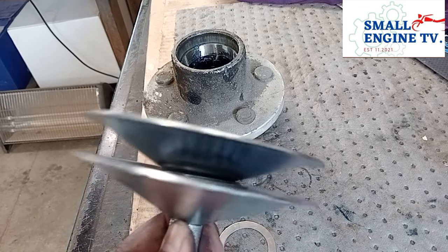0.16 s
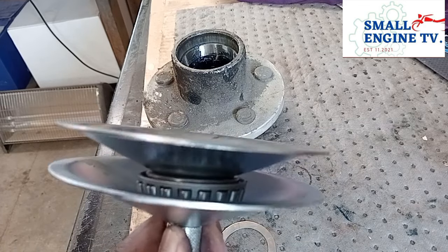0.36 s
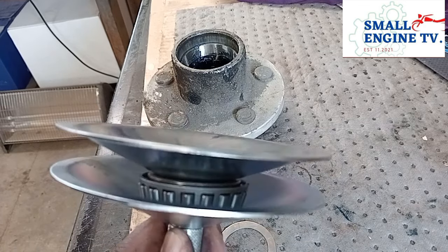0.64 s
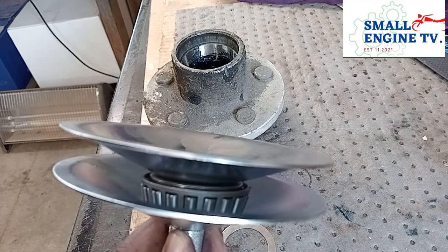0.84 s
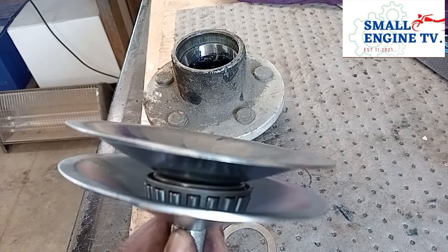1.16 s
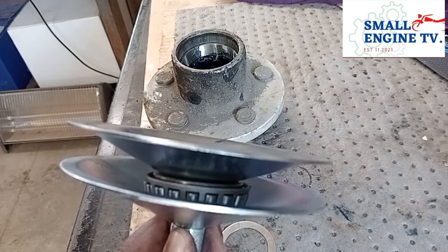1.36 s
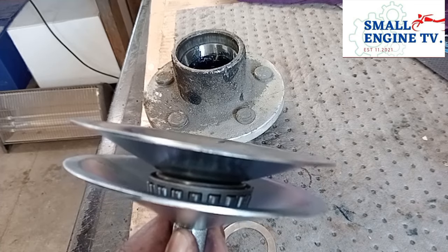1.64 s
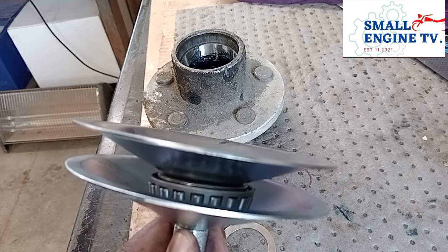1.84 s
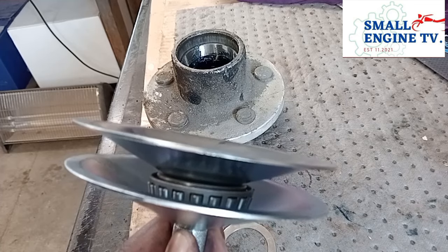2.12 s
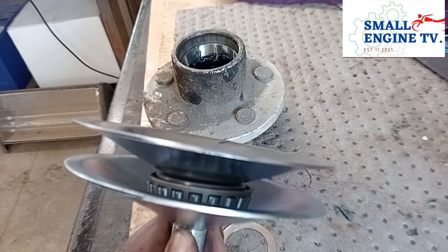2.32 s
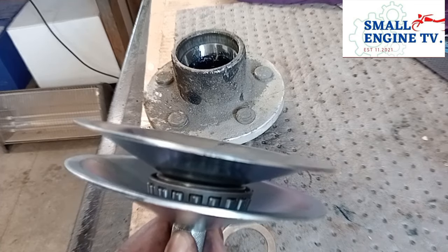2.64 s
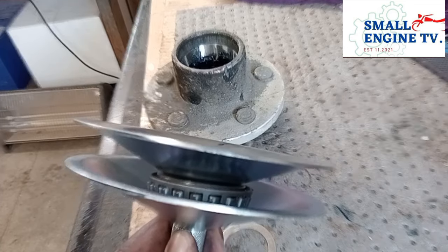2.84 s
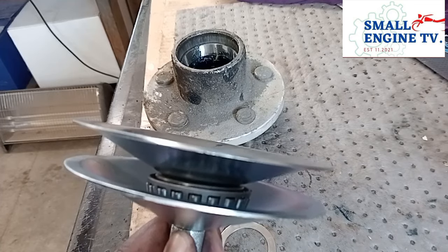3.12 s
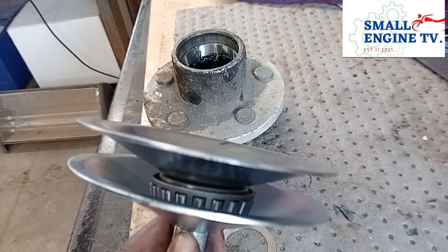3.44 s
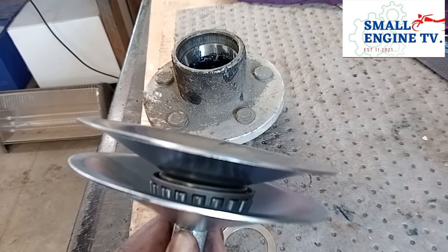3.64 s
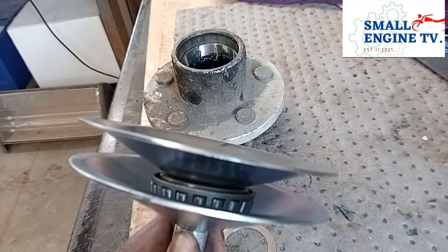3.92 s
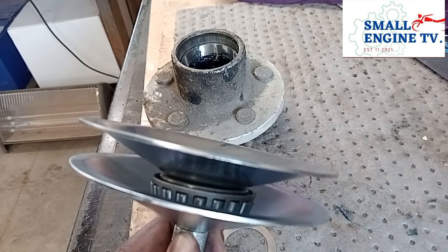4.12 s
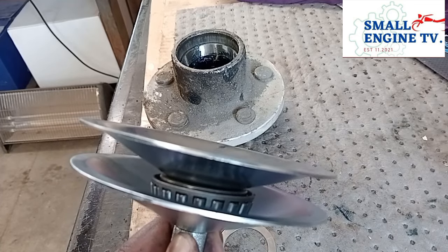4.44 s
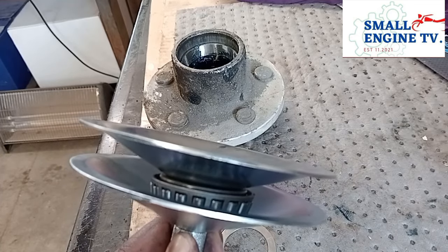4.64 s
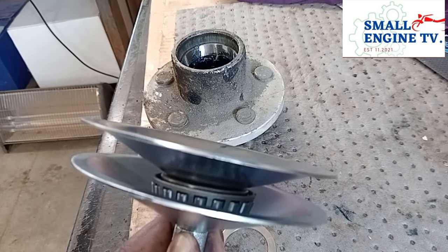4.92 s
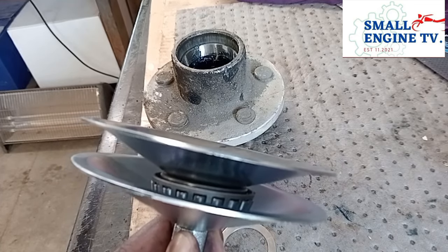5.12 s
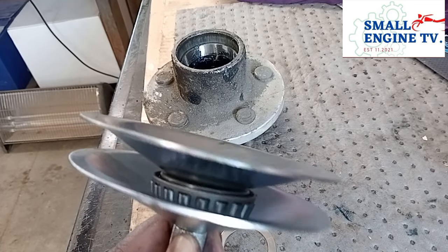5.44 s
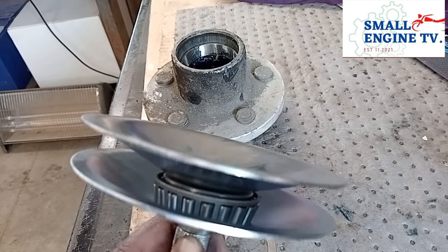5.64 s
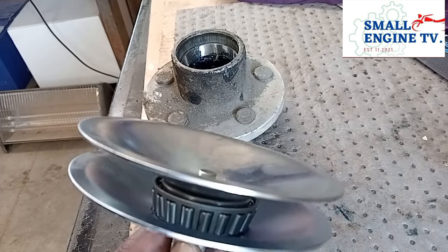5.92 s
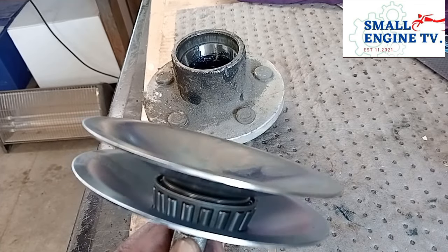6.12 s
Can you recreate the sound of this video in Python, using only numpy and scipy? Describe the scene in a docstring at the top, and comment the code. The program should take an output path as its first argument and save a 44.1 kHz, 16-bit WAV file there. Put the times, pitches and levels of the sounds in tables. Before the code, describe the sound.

A close, dry-edged sound in a small workshop with a short bright ring. Until 1.1 s there is only thin steady leak hiss, low rumble and wavering hum. At 1.1 s the air gun spits, its whistle sliding down from very high, with heavy crackling gusts on the microphone; three light knocks follow before it shuts near 1.7 s. A small hollow chuff comes at 1.8. The second pull, 2.1 to 2.9 s, starts with a strong wind pop, then hiss and steady knocks, ending in a burst of bleeding air. The third, 3.2 to 4.15 s, begins softly, then from 3.6 slams out five loud metallic cracks, most with deep booms. The fourth, 4.6 to 5.3 s, spits briefly, buffets and gives four moderate knocks. A last air bleed fades by 5.5 s, leaving faint hiss, rumble and hum to 6.3 s.

```python
"""An air-powered grease gun fills a bearing in a cone packer, close to the microphone, in a small workshop.
Four trigger pulls: each spits and whistles, then filtered noise hisses as air through the motor.
Meanwhile the piston knocks about 7.5 times a second: noise bursts ring the body, a low sine booms.
As the valve opens and shuts, exhaust blows across the microphone as random kicks through a filter.
A steady thin hiss, a low rumble and a wavering hum lie behind."""
import sys
import numpy as np
from scipy import signal
from scipy.fft import rfft, irfft
from scipy.io import wavfile
from scipy.ndimage import uniform_filter1d

SR = 44100
rng = np.random.default_rng(int(sys.argv[2]) if len(sys.argv) > 2 else 0)


def bounce(signal):
    """Save signal as a 16-bit WAV file at the path given by the first command-line argument."""
    frames = np.transpose(np.atleast_2d(signal))
    limited = np.clip(frames, -1, 1)
    pcm = np.round(limited * 32767).astype(np.int16)
    wavfile.write(sys.argv[1], SR, pcm)


N = 276948
TIME = np.arange(N) / SR

# trigger pulls: (valve opens [s], held for [s], relative spit level [dB], spit length [s])
TRIGGER_PULLS = [(1.069, 0.65, -17.5, 0.1), (2.07, 0.83, -18.5, 0.04), (3.164, 0.99, -17.5, 0.044),
                 (4.623, .672, -16.5, 0.021)]
# piston strokes: (time [s], relative knock level [dB], relative boom level [dB])
PISTON_STROKES = [(1.399, -32, -28), (1.535, -26, -30), (1.666, -24.5, -30), (2.213, -27.5, -26),
                  (2.346, -23.5, -27.5), (2.481, -23, -28), (2.615, -25, -27.5), (2.754, -23, -27),
                  (2.935, -21.5, -28.5), (2.963, -30.5, -32), (3.311, -24, -28), (3.438, -25, -24),
                  (3.57, -14, -17), (3.701, -12, -16), (3.831, -13.5, -15.5), (3.961, -13.5, -15.5),
                  (4.092, -12.5, -30), (4.768, -24.5, -30.5), (4.895, -25.5, -30), (5.025, -22.5, -26.5),
                  (5.158, -24, -27.5)]


def undb(db):
    """Decibels to gain."""
    return 10 ** (np.asarray(db) / 20)


def unit(x):
    """Scale to rms 1."""
    return x / np.sqrt(np.mean(x ** 2))


def add(out, start_s, x):
    """Mix x into out at start_s."""
    i = max(int(start_s * SR), 0)
    out[i:i + len(x)] += x[:N - i]


def walk(rate_hz):
    """Random levels held 1 / rate_hz and slewed twice; rms 1."""
    hold = int(SR / rate_hz)
    steps = rng.standard_normal(N)[np.arange(N) // hold]
    slewed = uniform_filter1d(steps, hold)
    return unit(uniform_filter1d(slewed, hold))


def colour(x, points, size=4096):
    """Minimum-phase filter of unit energy through points (frequency [Hz], relative level [dB])."""
    hz, db = np.transpose(points)
    bins_hz = np.maximum(np.arange(size // 2 + 1) * SR / size, 1)
    gain = undb(np.interp(np.log(bins_hz), np.log(hz), db))
    # fold the cepstrum to make the response causal
    cepstrum = irfft(np.log(gain))
    cepstrum[1:size // 2] *= 2
    cepstrum[size // 2 + 1:] = 0
    response = irfft(np.exp(rfft(cepstrum)))
    return signal.fftconvolve(x, response / np.linalg.norm(response))[:len(x)]


def noise(points):
    """Turbulent air with the given spectrum, rms near 1."""
    return colour(rng.standard_normal(N), points)


def ring(x, modes):
    """Parallel resonances (frequency [Hz], width [Hz], gain [dB])."""
    return sum(undb(db) * signal.lfilter(*signal.iirpeak(hz, hz / width_hz, SR), x)
               for hz, width_hz, db in modes)


def swell(start_s, length_s, attack_s, release_s):
    """Gain that rises in a straight line, holds until the length is over, then decays exponentially."""
    t = TIME - start_s
    rise = np.clip(t / attack_s, 0, 1)
    return rise * np.exp(-np.clip((t - length_s) / release_s, 0, 20))


def workshop(x, near_db=-5, near_s=0.004, tail_db=-12, t60_s=0.74):
    """Quick reflections off the bench and the steel cones, then the short ring of the room."""
    t = TIME[:SR]
    near, tail = rng.standard_normal((2, SR))
    near = near * np.exp(-t / near_s) * (t > 0.001)
    tail = colour(tail, [(100, -5), (400, -22.5), (1500, -3), (2800, -0.5), (3700, 5), (4800, 6),
                         (6000, 6.5), (8500, 1), (11000, 2.5), (14000, -42)])
    tail = tail * np.exp(-np.log(1000) * t / t60_s) * (t > 0.008)
    response = undb(near_db) * near / np.linalg.norm(near)
    response += undb(tail_db) * tail / np.linalg.norm(tail)
    response[0] += 1  # direct sound
    return signal.fftconvolve(x, response / np.linalg.norm(response))[:N]


def background(rumble_drift_db=1.5, leak_ring_db=-7):
    """A low rumble with a wavering hum, and a thin steady hiss as of a small leak in the air line."""
    # (time [s], rumble level [dB], hum level [dB], hiss level [dB])
    background_levels = [(0, -51, -46, -45), (1, -47, -47, -44), (4.5, -47.5, -65, -45.5),
                         (6.28, -50.5, -47.5, -47)]
    # (frequency [Hz], relative level [dB])
    rumble_spectrum = [(20, -22), (35, -30), (50, -34), (68, -28), (100, -4), (145, -4.5), (220, -9.5),
                       (350, -21.5), (600, -21), (1000, -27), (2000, -31), (3000, -55)]
    # (frequency [Hz], relative level [dB])
    leak_spectrum = [(1200, -20.5), (2000, -18), (2400, -8.5), (2700, -6.5), (3300, 0), (3900, -6.5),
                     (5500, -11.5), (6700, -5), (7500, -10.5), (8650, 1), (10800, -15.5), (13200, -7),
                     (15500, -11)]
    time_s, *levels = np.transpose(background_levels)
    rumble_db, hum_db, hiss_db = (np.interp(TIME, time_s, level) for level in levels)
    # two narrow resonances in series
    hum = ring(rng.standard_normal(N), [(72.2, 7, -2)])
    hum = unit(ring(hum, [(68, 10, 0)]))
    leak = noise(leak_spectrum)
    leak_modes = [(3070, 70, -10), (3960, 330, 6), (6420, 200, -15), (8460, 130, 14.5)]
    leak += undb(leak_ring_db) * unit(ring(rng.standard_normal(N), leak_modes))
    rumble = noise(rumble_spectrum) * undb(rumble_db + rumble_drift_db * walk(rate_hz=7))
    return rumble + hum * undb(hum_db) + workshop(leak) * undb(hiss_db)


def stall(dip_db=-3, lead_s=0.019, width_s=0.013):
    """The air flow sags as the piston slows just before each stroke."""
    dips = sum(np.exp(-((TIME - s + lead_s) / width_s) ** 2) for s, _, _ in PISTON_STROKES)
    return undb(dip_db * dips)


def air(hiss_db=6.5, port_db=-7, bleed_db=1, flutter_db=-1.56):
    """Air rushes through the motor and rings its passages; the rest bleeds off as the trigger is eased."""
    # the gun's body and air passages: (frequency [Hz], width [Hz], gain [dB])
    port_modes = [(2330, 81, -20), (2750, 180, 7), (3350, 24, -9), (3730, 130, -14), (4300, 120, -2),
                  (5220, 38, 0), (6170, 120, -3.5), (6940, 36, -12), (7160, 210, 0), (7860, 120, -6.5),
                  (8850, 280, 0), (8930, 180, 3), (10540, 190, -25), (10700, 73, -9.5)]
    # (frequency [Hz], relative level [dB])
    hiss_spectrum = [(150, -10), (300, -8.5), (700, -8.5), (1100, -5.5), (1800, -7), (2700, -6), (3800, -1),
                     (4700, -3.5), (5700, -9), (6700, -9), (8700, 1.5), (10300, -9.5), (13000, -9.5),
                     (15500, -11)]
    # (frequency [Hz], relative level [dB])
    bleed_spectrum = [(290, -49), (500, -20), (648, -23), (1130, -13), (1410, -18), (1560, -12),
                      (3150, -3.5), (5200, -3), (5590, -10.5), (8600, -4.5), (9930, -16), (15500, -14.5)]
    # flow through the motor while the trigger is held: (time [s], relative level [dB])
    flow_levels = [(1.1, -36), (1.7, -32.5), (2.12, -29.5), (2.4, -36), (2.83, -35), (2.88, -30.5),
                   (3.31, -34), (3.45, -43), (3.57, -33), (3.9, -30.5), (4.14, -26), (4.75, -33.5),
                   (4.86, -39.5), (5.02, -38), (5.28, -31.5)]
    # air bleeding off: (start [s], length [s], relative level [dB])
    bleed_events = [(1.465, 0.33, -35), (2.845, 0.035, -22.5), (5.299, .2, -31)]
    ports = unit(ring(rng.standard_normal(N), port_modes))
    valve = sum(swell(s, held_s, attack_s=0.0051, release_s=0.0081) for s, held_s, _, _ in TRIGGER_PULLS)
    flow = valve * stall() * undb(np.interp(TIME, *np.transpose(flow_levels)))
    hiss = (noise(hiss_spectrum) + undb(port_db) * ports) * flow * undb(hiss_db)
    escape = sum(undb(db) * swell(s, length_s, attack_s=0.024, release_s=0.017)
                 for s, length_s, db in bleed_events)
    bleed = noise(bleed_spectrum) * escape * undb(bleed_db)
    return (hiss + bleed) * undb(flutter_db * walk(rate_hz=34))


def spit(start_hz=4700, end_hz=8600, rise_s=0.025, jet_db=-3):
    """The opening valve spits at once; its jet, noise on a sine, rises in pitch as it gathers speed."""
    # (frequency [Hz], relative level [dB])
    spit_spectrum = [(100, -1), (250, -9), (700, -1.5), (1700, -12), (3000, -2.5), (4800, -0.5),
                     (6500, -3.5), (8600, 4.5), (10500, -25), (15500, -12.5)]
    t = TIME[:SR // 4]
    pitch_hz = end_hz + (start_hz - end_hz) * np.exp(-(t / rise_s) ** 2)
    carrier = np.sin(2 * np.pi * np.cumsum(pitch_hz) / SR)
    gain, jet = np.zeros(N), np.zeros(N)
    for s, _, db, length_s in TRIGGER_PULLS:
        opening = undb(db) * np.minimum(t / 0.0027, 1) * np.exp(-(t / length_s) ** 3)
        add(gain, s, opening)
        add(jet, s, opening * carrier)
    jet *= np.sqrt(2) * noise([(400, 3), (900, 4), (2500, -13.5)])
    return gain * noise(spit_spectrum) + undb(jet_db) * jet


def gusts(wake_db=-32, opening_db=-27, opening_s=0.012, core_share=0.81):
    """Wind strength and its crackling core: a small puff as the valve opens, then gusts with weak wakes."""
    # (start [s], length [s], relative buffeting [dB], relative crackle [dB], wake length [s])
    gust_events = [(1.123, 0.021, -18.5, -23.5, .02), (1.165, .012, -19, -13.5, .015),
                   (1.189, 0.049, -22, -17, 0), (1.242, 0.04, -22, -17, 0),
                   (1.286, 0.067, -19.5, -16.5, .15), (1.674, 0.035, -19, -36, .005),
                   (2.103, .025, -13.5, -11, .055), (2.865, 0.0103, -15.5, -27, 0),
                   (3.197, 0.031, -18, -17, 0.083), (4.122, 0.0096, -21.5, -25, .005),
                   (4.646, 0.05, -19.5, -14.5, .06), (5.254, 0.013, -22.5, -20.5, .015)]
    wind = undb(opening_db) * sum(swell(s, opening_s, attack_s=0.002, release_s=0.015)
                                  for s, _, _, _ in TRIGGER_PULLS)
    core = np.zeros(N)
    for s, length_s, wind_db, crackle_db, wake_s in gust_events:
        wind += undb(wind_db) * swell(s, length_s, attack_s=0.0033, release_s=0.0071)
        wind += undb(wake_db) * swell(s + length_s, wake_s, attack_s=0.004, release_s=0.007)
        core += undb(crackle_db) * swell(s, core_share * length_s, attack_s=0.0032, release_s=0.012)
    return wind, core


def eddies(rate_hz, scatter_db):
    """Kicks at random moments, of either sign and uneven size; rms near 1."""
    chance = np.maximum(rate_hz, 1) / SR
    signs = rng.choice([-1, 1], N)
    sizes = signs * undb(scatter_db * np.clip(rng.standard_normal(N), -2, 1.5))
    return (rng.random(N) < chance) * sizes / np.sqrt(chance)


def buffeting(eddy_rate_hz=330, crackle_rate_hz=1500, gust_db=5, surge_db=-1, uneven_db=3, tear_db=-14):
    """Eddies strike the microphone as random pressure kicks; a stronger wind sheds them faster."""
    # single strong eddies that pop on the microphone: (time [s], peak [dB])
    thump_events = [(1.174, -1), (1.231, 0), (1.364, -3), (1.378, -5.5), (1.425, -8.5), (1.471, -6),
                    (1.505, -12), (1.704, -4.5), (2.151, 2.5), (2.166, -6), (2.186, -7), (2.87, -7.5),
                    (3.23, -7), (3.255, -12), (4.129, -4.5), (4.731, -11.5), (5.256, -5.5), (5.267, -6)]
    # (frequency [Hz], relative level [dB])
    eddy_spectrum = [(25, -46), (60, -4.5), (110, 4), (250, -0.5), (600, -7), (1200, -15.5), (2500, -19.5),
                     (4000, -31.5), (6000, -28), (12000, -76)]
    # (frequency [Hz], relative level [dB])
    crackle_spectrum = [(60, -5), (200, 1), (750, 2.5), (1500, -4.5), (2800, -3), (4200, -5), (6000, -30),
                        (13000, -43)]
    strength, core = gusts()
    # eddy_rate_hz holds at a strength of -20 dB
    kicks = eddies(eddy_rate_hz * strength / undb(-20), scatter_db=-1) * strength
    pressure = colour(kicks, eddy_spectrum) * undb(gust_db)
    thump = colour(signal.unit_impulse(SR // 20), eddy_spectrum)
    for s, db in thump_events:
        add(pressure, s, -undb(db) * thump / thump.max())
    surge = core * undb(surge_db + uneven_db * walk(rate_hz=90))
    pressure += colour(surge * eddies(crackle_rate_hz, scatter_db=2.5), crackle_spectrum)
    # fine turbulence tears at the microphone while an eddy presses on it
    tearing = np.abs(pressure) * noise([(300, -8.5), (1000, 14), (3500, -10), (5500, -4), (14000, -35)])
    return pressure + undb(tear_db) * tearing


def whistle(waver=0.0232, flicker_db=2.5, level_db=-4, bend=1.5, peak_s=0.02, peak_width_s=0.015, hold_db=-9):
    """Unsteady edge tone at the half-open valve: flares, then holds softly; its pitch slides ever faster."""
    # (start [s], length [s], first pitch [Hz], last pitch [Hz], relative level [dB])
    seat_whistles = [(1.103, 0.21, 8000, 6950, -11), (1.68, 0.033, 5160, 5920, -23),
                     (2.082, 0.056, 8030, 5250, -14), (3.186, 0.041, 7780, 5770, -16),
                     (4.629, 0.033, 8700, 7500, -11.5)]
    unsteady = 1 + waver * walk(rate_hz=1000)
    flicker = unit(undb(flicker_db * walk(rate_hz=200)))
    out = np.zeros(N)
    for s, length_s, first_hz, last_hz, db in seat_whistles:
        slide = np.clip((TIME - s) / length_s, 0, 1) ** bend
        pitch_hz = first_hz + (last_hz - first_hz) * slide
        flare = np.exp(-((TIME - s - peak_s) / peak_width_s) ** 2)
        gain = (flare + undb(hold_db)) * swell(s, length_s, attack_s=0.006, release_s=0.003)
        out += undb(db) * gain * np.sin(2 * np.pi * np.cumsum(pitch_hz * unsteady) / SR)
    return out * flicker * undb(level_db)


def knocks(contact_s=0.0087, rattle_s=0.024, rattle_db=-16, body_db=6, crack_db=-3.5):
    """At each stroke the piston slams its stop with a broad crack and chatters in the metal body."""
    # (frequency [Hz], width [Hz], gain [dB])
    body_modes = [(1137, 37, -12.5), (1350, 250, -6), (1810, 1600, -16), (2650, 190, 4.5), (3240, 52, -3),
                  (3574, 59, 3), (4050, 260, -8.5), (4580, 130, -12), (8830, 930, -9.5),
                  (10200, 610, -26.5)]
    t = TIME[:SR // 6]
    hit = np.exp(-(t / contact_s) ** 2) + undb(rattle_db) * np.exp(-t / rattle_s)
    force = np.zeros(N)
    for s, db, _ in PISTON_STROKES:
        add(force, s, undb(db) * hit)
    force = force * rng.standard_normal(N)
    crack = colour(force, [(100, -4.5), (260, 10.5), (450, -14), (900, -9), (1400, -8), (2000, -11),
                           (4500, -7), (6000, -22.5), (10500, -9), (14000, -21.5)])
    body = colour(ring(force, body_modes), [(1000, 2.5), (4500, -3), (5800, -16.5), (8500, -1),
                                            (11000, 3.5), (14000, -23)])
    return undb(body_db) * body + undb(crack_db) * crack


def boom(boom_hz=152.5, push_s=0.013, return_s=0.032, swell_s=0.026, push_db=0.5, return_db=2):
    """The stroke and the piston's return each swell a low tone, in opposite directions."""
    t = TIME[:SR // 3]
    late = np.maximum(t - return_s, 0) / swell_s
    push = undb(push_db) * t / push_s * np.exp(1 - t / push_s)
    back = undb(return_db) * late ** 2 * np.exp(2 - 2 * late)
    tone = (push - back) * np.sin(2 * np.pi * boom_hz * t)
    out = np.zeros(N)
    for s, _, db in PISTON_STROKES:
        add(out, s, undb(db) * tone)
    return out


def exhaust(delay_s=0.035, spread_s=0.035, level_db=-8):
    """The returning piston pushes a puff of spent air out of the motor's port."""
    gain = sum(undb(db) * np.exp(-((TIME - s - delay_s) / spread_s) ** 2) for s, _, db in PISTON_STROKES)
    puff = noise([(500, -9.5), (1500, -11.5), (2700, -8), (3700, -2.5), (4400, -8), (5600, -28),
                  (8500, -2), (10500, -33), (15000, -33)])
    return gain * puff * undb(level_db)


def chuff(start_s=1.792, length_s=0.034, level_db=-21):
    """One short hollow puff of trapped air follows the first pull."""
    puff = noise([(800, -26), (1800, -11.5), (2550, 5.5), (2950, 0), (3800, -6), (6800, -11.5),
                  (8100, -2.5), (9200, -11.5), (15000, -39)])
    return puff * swell(start_s, length_s, attack_s=0.015, release_s=0.026) * undb(level_db)


def scene():
    """The gun sounds in the room; boom and buffeting stay dry, the latter at the microphone itself."""
    gun = workshop(air() + spit() + whistle() + chuff() + knocks() + exhaust())
    return (gun + boom() + buffeting() + background())[None]


def record(dry, ceiling=0.97, top_hz=15700):
    """The microphone rounds the loudest peaks and the top is cut."""
    rounded = dry / (1 + (dry / ceiling) ** 4) ** (1 / 4)
    lowpass = signal.ellip(10, 0.2, 70, top_hz, fs=SR, output="sos")
    return signal.sosfilt(lowpass, rounded)


dry = scene()
out = record(dry)
bounce(out)
```